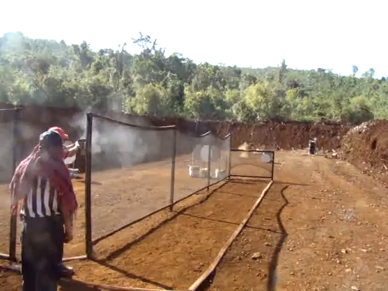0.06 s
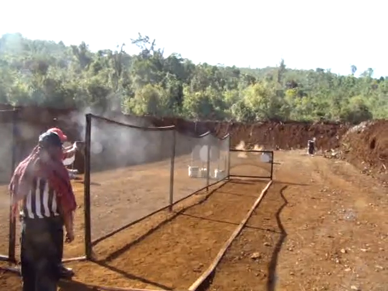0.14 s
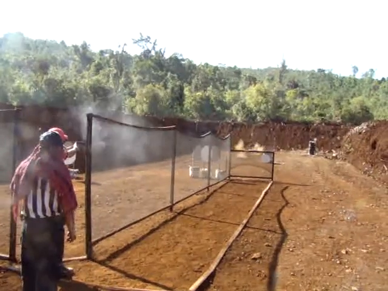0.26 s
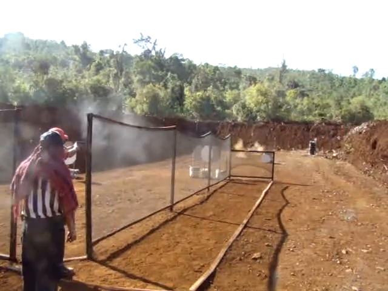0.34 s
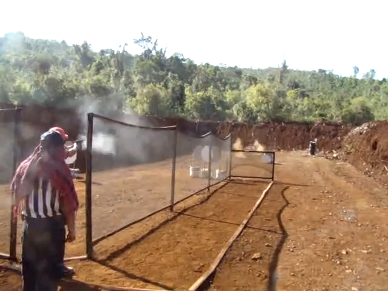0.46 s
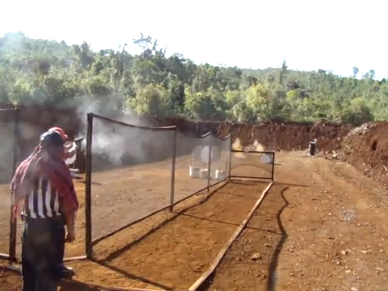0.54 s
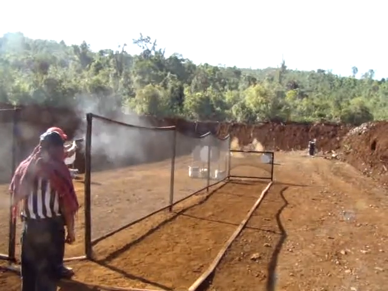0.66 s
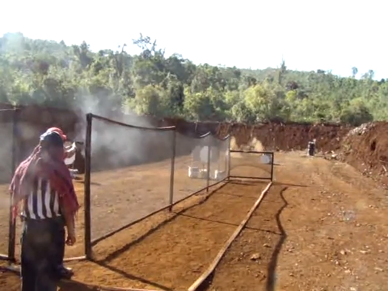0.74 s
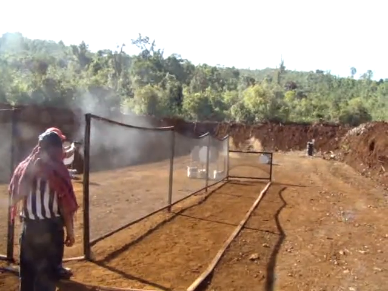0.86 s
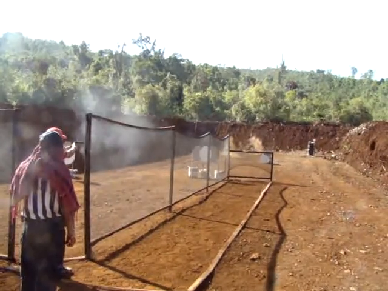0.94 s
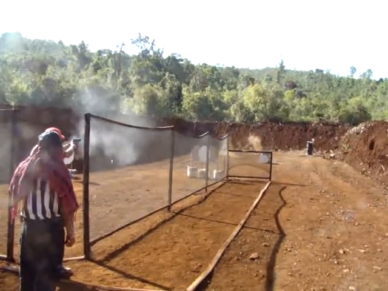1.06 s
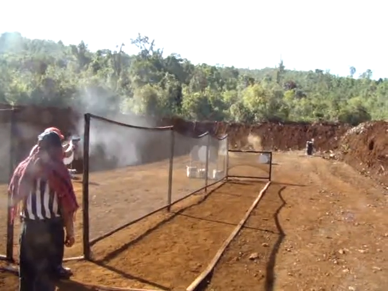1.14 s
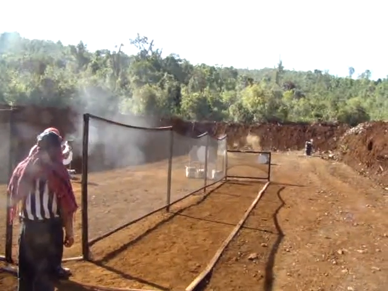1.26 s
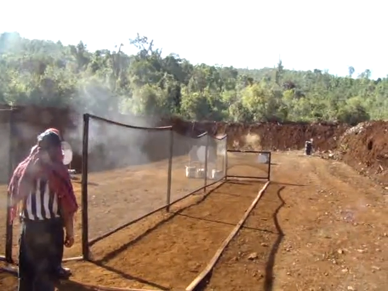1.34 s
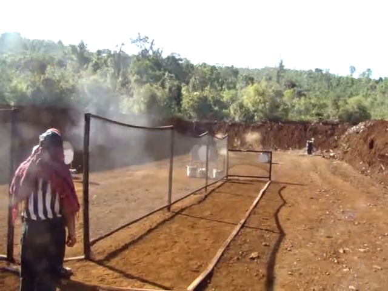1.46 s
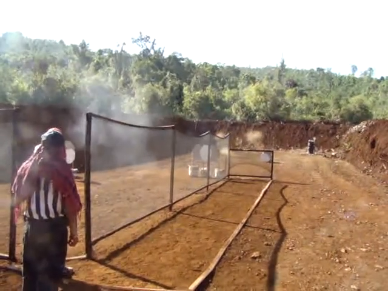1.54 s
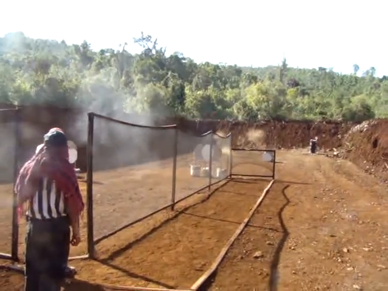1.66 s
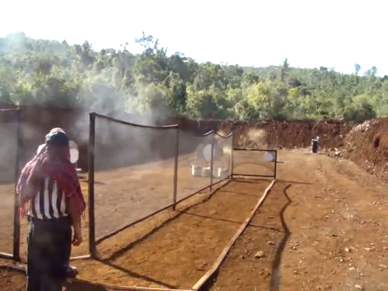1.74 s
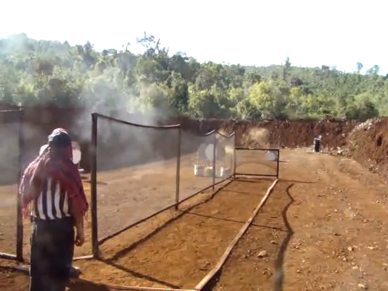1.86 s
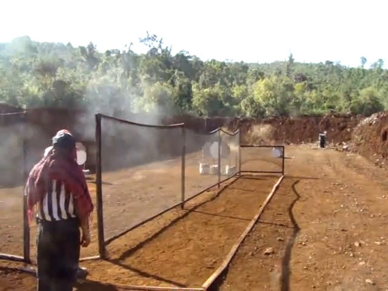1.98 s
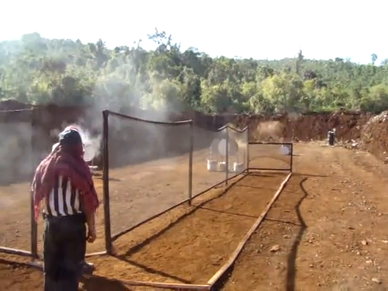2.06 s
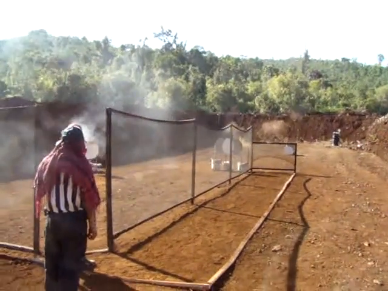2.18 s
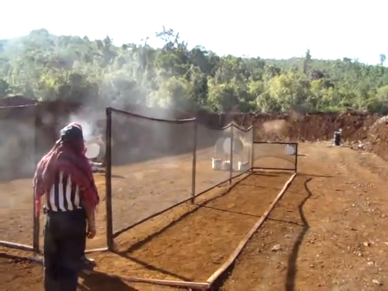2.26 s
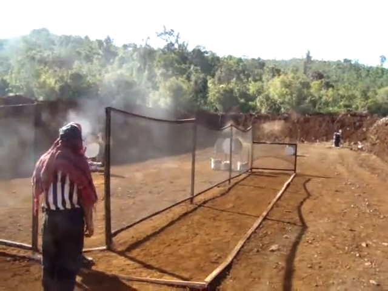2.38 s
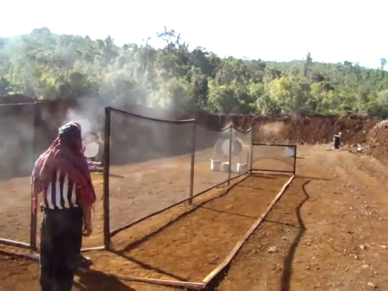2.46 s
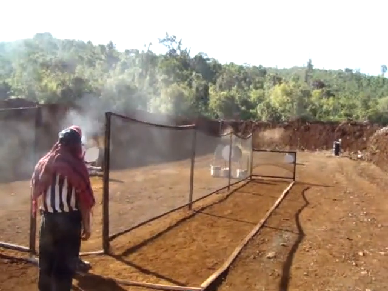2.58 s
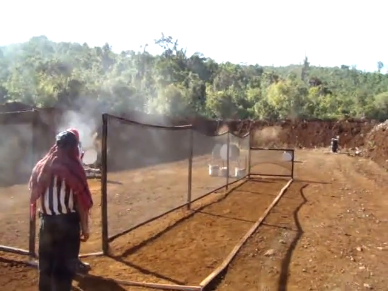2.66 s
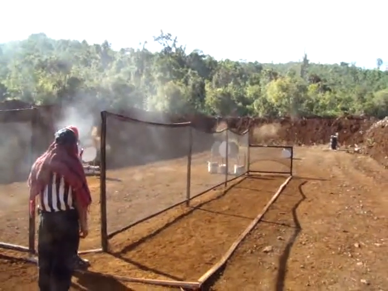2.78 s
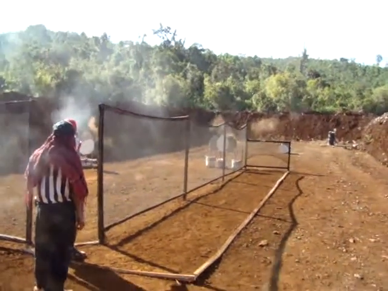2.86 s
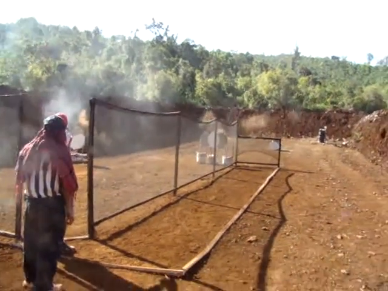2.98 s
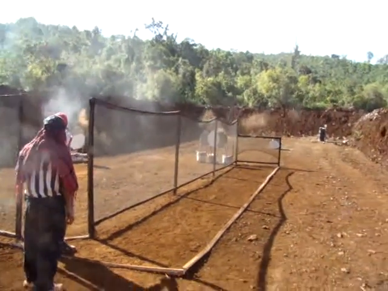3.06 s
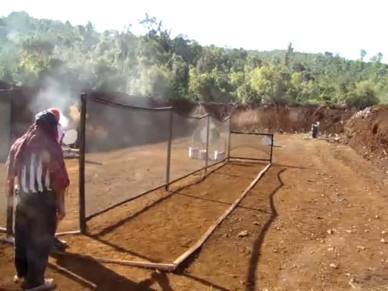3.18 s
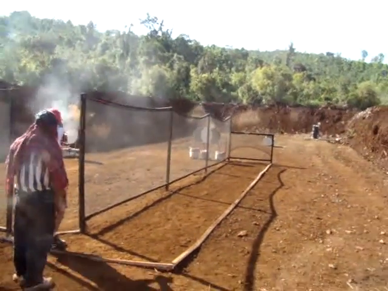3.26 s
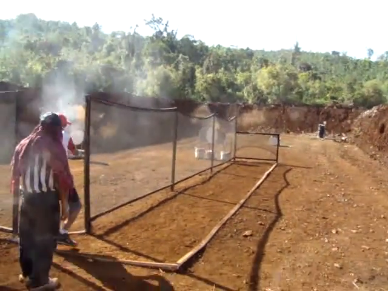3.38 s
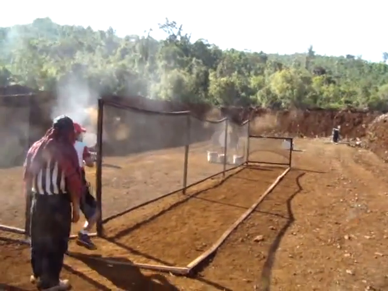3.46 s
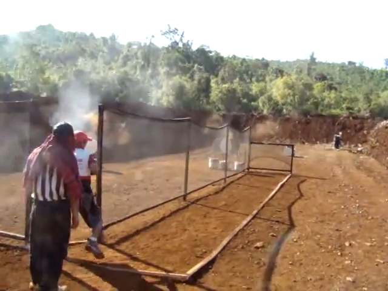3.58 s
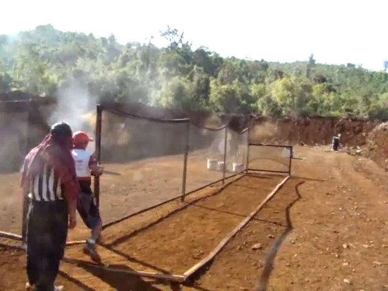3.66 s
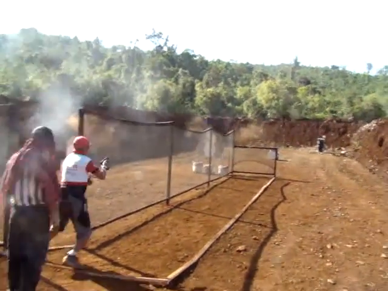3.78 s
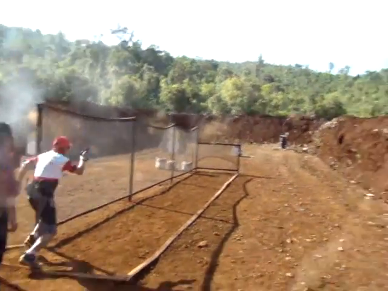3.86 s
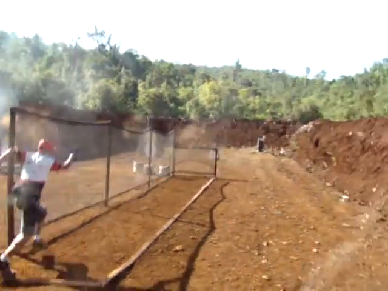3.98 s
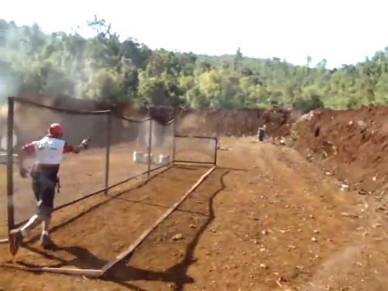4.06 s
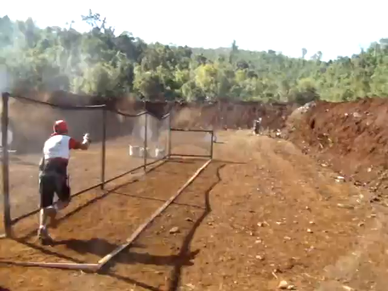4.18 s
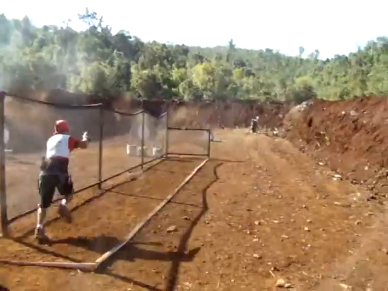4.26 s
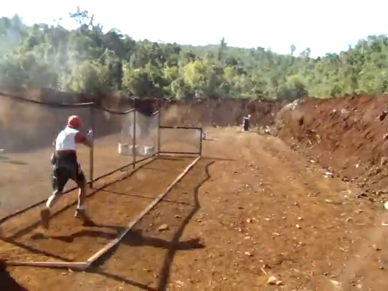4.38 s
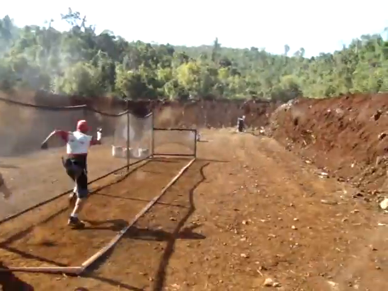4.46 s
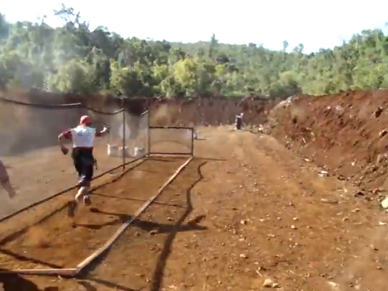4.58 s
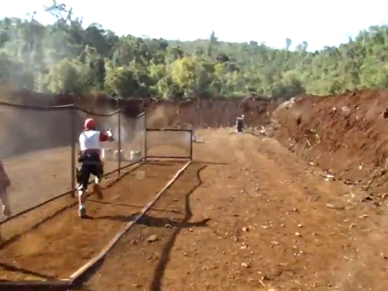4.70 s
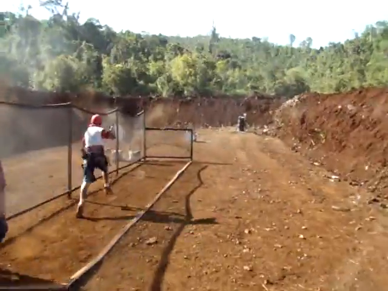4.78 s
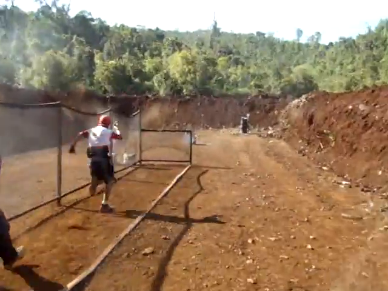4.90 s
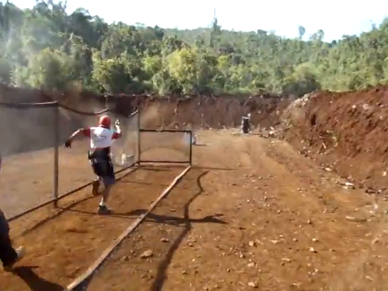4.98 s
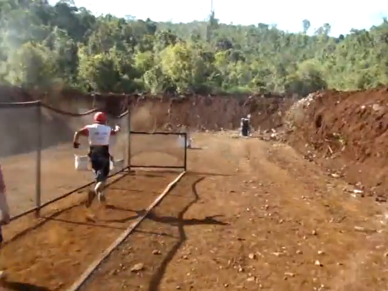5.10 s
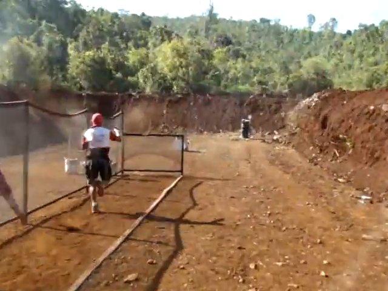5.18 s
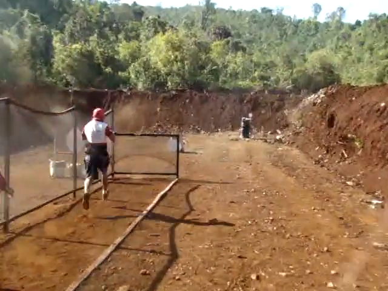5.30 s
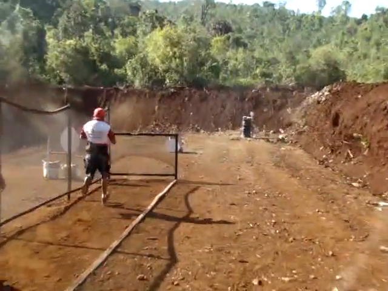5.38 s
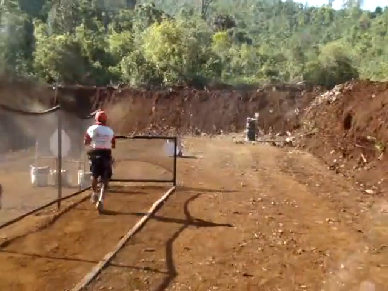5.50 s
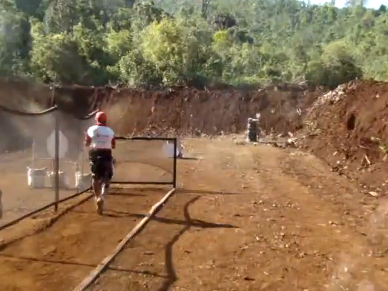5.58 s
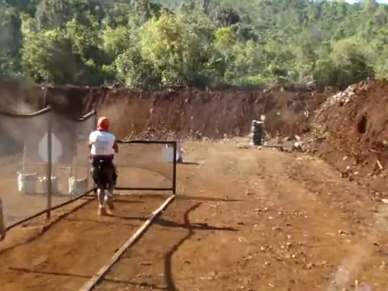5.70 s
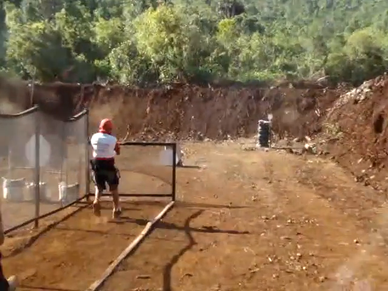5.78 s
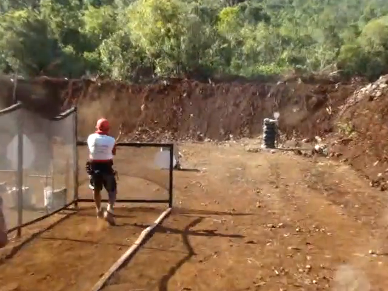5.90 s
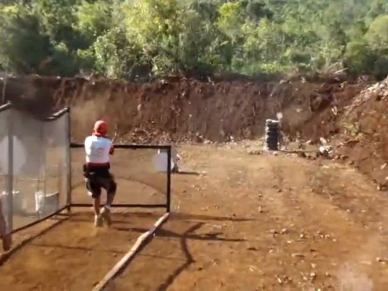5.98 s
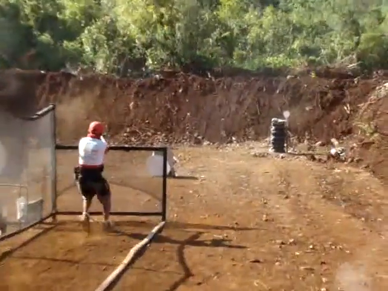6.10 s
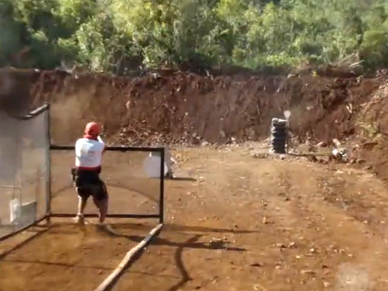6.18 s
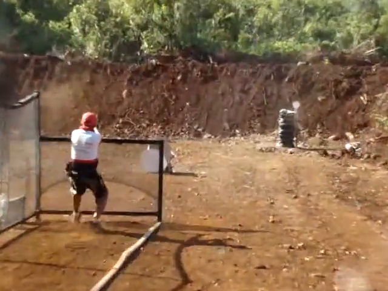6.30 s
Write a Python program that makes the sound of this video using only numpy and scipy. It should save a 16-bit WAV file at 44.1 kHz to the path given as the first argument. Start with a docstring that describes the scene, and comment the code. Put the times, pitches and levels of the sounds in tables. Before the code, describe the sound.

Sharp, slightly distorted handgun shots ring out close by in an earth-walled shooting range: three, a short pause with the tick of a landing case, then three more. Each has a quick rattling echo and a long, dull tail from far hills. As the last dies away, much quieter running footsteps scuff and crunch across gravelly ground. A soft wash of outdoor air lies beneath, all picked up by one small mono microphone.

```python
"""A handgun fires a string of shots in an earth-walled range bay, a few metres from a small mono camera.
Each blast overloads the microphone, rattles round the bay, slaps off screens and banks, and rolls back
from distant wooded hills. A spent case ticks as it lands; soft open air and a faint hum lie underneath.
Then the shooter runs on and boots follow, thudding and crunching over dry, stony dirt."""
import sys
import numpy as np
from scipy import signal
from scipy.fft import rfft, irfft
from scipy.io import wavfile

SR = 44100
rng = np.random.default_rng(int(sys.argv[2]) if len(sys.argv) > 2 else 0)


def to_wav(sig):
    """Store sig (one row per channel, or 1-D mono) as 16-bit WAV at the path in sys.argv[1].

    Samples outside -1..1 are clipped; the rate is SR.
    """
    pcm = np.clip(np.atleast_2d(sig), -1, 1) * 32767
    pcm = np.round(pcm).astype(np.int16)
    wavfile.write(sys.argv[1], SR, pcm.T)  # frames by channels


N = 279808
T = np.arange(N) / SR
AGE = T[:3 * SR]  # seconds since a sound began

# shots; only the tail of the first is heard
# (time [s], level [dB], treble [dB], ground bounce [dB], back bank [dB], hills [dB])
SHOTS = [(-0.115, 4, -1.5, -6, -22, -19.5), (0.045, -1, 4.5, -4, -18, -1), (0.6380, -2, 4, -10, -17, -3),
         (1.1524, -3, 3, -3, -14.5, -2.5), (2.1796, -.8, 4, -6.5, -18, -3), (2.7230, -3, 4, -4, -17, -1.5),
         (3.3192, -1.8, 2.5, -5, -19, -4)]
# microphone resonances rung by the blast (frequency [Hz], decay [s], level [dB])
MIC_RESONANCES = [(2340, 0.0022, -9.5), (3300, 0.0015, -6.5), (770, 0.0039, -17), (338, 0.0066, -31)]
# slaps from screens and banks close by (delay [s], relative level [dB], decay [s])
NEAR_SLAPS = [(0.0163, -9.5, 0.00073), (.0328, -43, 0.0031), (.0500, -14, 0.0021)]
# dull returns from the far hills (delay [s], relative level [dB])
HILL_ECHOES = [(.172, -31), (.443, -29.5), (0.504, -31), (0.54, -29.5), (.615, -34), (.785, -35.5)]
# tone of the shot off each surface, heard at the microphone (frequency [Hz], relative level [dB])
BAY_TONE = [(50, -25), (150, -38), (220, -22.5), (330, -2), (550, 1.5), (850, 6), (1400, -1.5),
            (2000, -3.5), (2700, -2), (3600, -0.5), (4300, -2.5), (5500, -9), (10000, -12.5)]
SLAP_TONE = [(100, -17.5), (300, -16), (650, 8), (1300, -10), (2200, 11.5), (3400, 6), (4500, 2),
             (6000, 3.5), (10000, -4)]
SIDE_BANK_TONE = [(150, -33.5), (400, -6), (900, 3.5), (1400, -3), (2200, -17), (3500, 3.5), (4300, -26),
                  (6000, -38), (10000, -11.5)]
BACK_BANK_TONE = [(100, -33), (330, -9), (650, 3), (1300, -19), (2000, -8), (3000, 0.5), (4500, -4.5),
                  (6000, -7.5), (10000, -11.5)]
BANK_RING_TONE = [(35, -78), (60, -40), (107, -58), (175, -18), (606, 1.5), (703, 0), (890, 2), (1460, -3),
                  (2600, -2), (3150, 1), (3820, -2.5), (7410, -5), (10000, -9), (13000, -52), (22000, -120)]
FOREST_TONE = [(200, -35), (500, -11.5), (1000, -10), (1700, -3.5), (2500, 0.5), (3300, 1.5), (4200, -2.5),
               (6500, -7), (10000, -14)]
HILL_KNOCK_TONE = [(150, -41), (380, -16.5), (540, -1.5), (720, -5), (1050, -10.5), (1500, -21),
                   (3000, -24), (8000, -63)]
HILL_ROLL_TONE = [(150, -30), (350, -10), (550, -7), (800, -2), (1100, 4), (1500, -2), (3000, -40),
                  (8000, -70)]
# tone of the open air and of the sounds underfoot (frequency [Hz], relative level [dB])
AIR_TONE = [(18, -104), (30, -21.5), (96, -22), (177, -25), (215, -24.5), (385, -15.5), (541, -1),
            (901, -1.5), (970, 0.5), (1180, -13.5), (1270, -7), (1700, -14), (3430, -19.5), (10000, -36),
            (13000, -69), (22000, -120)]
DIRT_TONE = [(18, -65), (30, -31), (81, -17), (215, -3.5), (385, 0.5), (742, 0.5), (970, -5), (1070, 4.5),
             (1360, -6), (4270, -9), (6780, -15.5), (8440, -14), (10000, -27), (13000, -105), (22000, -120)]
STONE_TONE = [(150, -19), (500, -24.5), (1200, -2.5), (2000, -8.5), (3500, -2.5), (6000, -7.5), (10000, -6)]
SOLE_TONE = [(30, -24), (100, -27), (210, 2.5), (330, -9.5), (700, -8.5), (1200, -11), (2500, -20),
             (8000, -36)]
# a spent case ticking as it lands, then loose stones tapping (time [s], level [dB], ring [Hz])
CASE_AND_STONE_CLICKS = [(1.368, -28, 8700), (4.274, -38, 1150), (4.450, -42, 1500), (4.791, -41.5, 2870),
                         (5.056, -36, 2880), (5.390, -38, 4200), (5.858, -34, 1200), (5.9787, -31, 7200)]
# a boot grinding on gravel (time [s], level [dB], decay [s])
GRAVEL_CRUNCHES = [(4.880, -34, .016), (4.954, -42, 0.015), (5.434, -36, 0.0076), (5.536, -38.5, .05),
                   (5.72, -38, .015), (5.792, -37, 0.011), (5.9788, -25, .002), (6.297, -46, .05)]
# footfalls (time [s], sole thud [dB], ground knock [dB], knock pitch [Hz])
FOOTFALLS = [(4.717, -56, -43, 594), (5.058, -44.5, -49, 700), (5.151, -46.5, -49, 660),
             (5.465, -48, -37.5, 980), (5.575, -44, -40, 700), (5.612, -38, -52, 654),
             (5.791, -40, -35.5, 950), (5.815, -37, -49, 400), (5.977, -38.5, -42, 1110),
             (6.249, -52.5, -40, 1160), (6.295, -43, -40, 709)]

MOVE_START_S, MOVE_RISE_S = 4.22, 1.19


def undb(db):
    """Decibels to gain."""
    return 10 ** (np.asarray(db) / 20)


def noise(size=len(AGE)):
    """White noise of unit power."""
    return rng.standard_normal(size)


def colour(x, tone, size=2048):
    """Causal filter through (Hz, dB) points that keeps the power of white noise."""
    hz, db = np.transpose(tone)
    log_hz = np.log(np.fft.rfftfreq(size, 1 / SR) + 1)
    gain = undb(np.interp(log_hz, np.log(hz), db))
    gain /= np.sqrt(np.mean(gain ** 2))
    cepstrum = irfft(np.log(gain))
    cepstrum[1:size // 2] *= 2  # fold to minimum phase
    cepstrum[size // 2 + 1:] = 0
    impulse = irfft(np.exp(rfft(cepstrum)))
    return signal.fftconvolve(x, impulse)[:len(x)]


def band(x, hz, kind, order=2):
    """Butterworth filter."""
    return signal.sosfilt(signal.butter(order, hz, kind, fs=SR, output="sos"), x)


def burst(delay_s, decay_s):
    """Envelope that jumps up after a delay and dies away."""
    return (AGE >= delay_s) * np.exp(-np.abs(AGE - delay_s) / decay_s)


def wander(per_s):
    """Slow random drift with a spread near 1."""
    count = int(N / SR * per_s) + 2
    return np.interp(T * per_s, np.arange(count), noise(count))


def grains(per_s, spread_db, size=len(AGE)):
    """A dense train of separate small pulses, unit power."""
    hits = rng.random(size) < per_s / SR
    polarity = np.sign(noise(size))
    strength = undb(spread_db * np.minimum(rng.exponential(size=size), 3))
    train = hits * polarity * strength
    return train / train.std()


def resonance(hz, width, size):
    """Noise in one resonance of a relative width, unit power."""
    edge = 1 + width / 2
    ringing = band(noise(size), [hz / edge, hz * edge], "band", order=1)
    return ringing / ringing.std()


def add(out, s, sound):
    """Mix a sound in at time s."""
    start = int(round(s * SR))
    sound, start = sound[max(-start, 0):], max(start, 0)
    out[start:start + len(sound)] += sound[:N - start]


def muzzle_blast(push_s=0.00011, gas_s=0.0032):
    """A shock front and its suction ring the microphone; powder gas tears out behind."""
    front = undb(-6) * (1 - AGE / push_s) * np.exp(-AGE / push_s)
    ring = sum(undb(db) * np.sin(2 * np.pi * hz * AGE) * burst(0, decay_s)
               for hz, decay_s, db in MIC_RESONANCES)
    gas = undb(-9) * colour(noise() * burst(0, gas_s), BAY_TONE)
    return gas - band(front + ring, 200, "high")


def slap(delay_s, db, decay_s, shock_db, smear_db=-3):
    """A flat face returns the shock as one sharp pulse, its edges as a short smear."""
    echo = undb(smear_db) * noise() * burst(delay_s, decay_s)
    echo[int(delay_s * SR)] += undb(shock_db)
    return undb(db) * echo


def posts(count=7, near_s=0.006, far_s=0.05, loss_db_per_s=130):
    """Posts and frames round the bay throw back thin cracks, weaker the longer their path."""
    cracks = np.zeros(len(AGE))
    for place, strength in rng.random((count, 2)):
        delay_s = near_s + place * (far_s - near_s)
        cracks[int(delay_s * SR)] += undb(-2.5 + 6 * strength - loss_db_per_s * delay_s)
    return colour(cracks, SLAP_TONE)


def bay(ground, side_delay_s, back_db, back_delay_s=0.0952, leave_s=0.055):
    """Rough ground scatters the blast until it has left the bay; screens and banks slap back."""
    inside = 1 / (1 + (AGE / leave_s) ** 20)
    scatter = colour(ground * undb(-16) * burst(0.00216, 0.046) * inside, BAY_TONE)
    near = colour(sum(slap(*row, shock_db=13.5) for row in NEAR_SLAPS), SLAP_TONE)
    side = colour(slap(side_delay_s, -12, 0.003, shock_db=17, smear_db=-2), SIDE_BANK_TONE)
    back = colour(slap(back_delay_s, back_db, 0.0021, shock_db=15.5, smear_db=0), BACK_BANK_TONE)
    return scatter + posts() + near + side + back


def banks_and_forest(tree_clumps, banks_decay_s=0.098, forest_decay_s=0.48):
    """The earth banks ring briefly; clumps of trees on the slopes return a long, lumpy hiss."""
    banks = colour(noise() * burst(0.045, banks_decay_s), BANK_RING_TONE)
    forest = colour(noise() * burst(0.11, forest_decay_s), FOREST_TONE)
    return undb(-27.5) * banks + undb(-41.5 + 0.4 * tree_clumps) * forest


def hills(knock_decay_s=0.018, roll_decay_s=1.0):
    """Distant slopes answer every shot with the same hollow knocks over a low roll."""
    knocks = sum(slap(delay_s, db, knock_decay_s, shock_db=18) for delay_s, db in HILL_ECHOES)
    roll = noise() * burst(0.039, roll_decay_s)
    return undb(-5) * colour(knocks, HILL_KNOCK_TONE) + undb(-50) * colour(roll, HILL_ROLL_TONE)


def gunfire(split_hz=700, treble_hz=1800):
    """Shots a few metres off: long waves keep their paths, short ones change as the muzzle moves."""
    out = np.zeros(N)
    hill_echo = hills()
    long_waves = band(grains(6000, 2.4), split_hz, "low")
    tree_clumps = wander(22.2)[:len(AGE)]
    for s, db, treble_db, bounce_db, back_db, hill_db in SHOTS:
        ground = long_waves + band(grains(3500, 5.5), split_hz, "high")
        bounce = colour(slap(0.0031, bounce_db, 0.0014, shock_db=12), BAY_TONE)
        # the side bank answers a little sooner once the shooter has leaned toward it
        side_delay_s = np.interp(s, [1.2, 2.1], [0.0462, 0.0452])
        shot = muzzle_blast() + bounce + bay(ground, side_delay_s, back_db)
        shot += banks_and_forest(tree_clumps)
        shot += (undb(treble_db) - 1) * band(shot, treble_hz, "high", order=1)
        add(out, s, undb(db) * (shot + undb(hill_db) * hill_echo))
    return out


def open_air(level_db=-54.5):
    """A soft wash all round the microphone, its level drifting slightly."""
    return colour(noise(N), AIR_TONE) * undb(level_db + wander(3.29))


def hum(starts_s=(0.513, 3.416), length_s=0.134, fade_s=0.0037, hz=197.3):
    """A faint low hum with a weaker octave comes twice, alike each time."""
    phase = 2 * np.pi * hz * T
    tone = np.sqrt(2) * (np.sin(phase) + undb(-2.5) * np.sin(2 * phase))
    gate = sum(np.clip(np.minimum(T - s, s + length_s - T) / fade_s, 0, 1) for s in starts_s)
    return undb(-60) * gate * tone


def click(hz, decay_s=0.0044, size=12000):
    """A spent case or a stone taps the stony ground: a short ring with a little grit."""
    ring = resonance(hz, width=0.34, size=size)
    grit = undb(-2.5) * colour(grains(7000, 2.9, size), STONE_TONE)
    return burst(0, decay_s)[:size] * (ring + grit)


def case_and_stones(pebbles_per_s=8, pebble_hz=2000, spread_octaves=0.84, size=12000):
    """A spent case lands; later gravel crunches, stones click and kicked pebbles skitter underfoot."""
    out = np.zeros(N)
    for s, db, decay_s in GRAVEL_CRUNCHES:
        gravel = colour(grains(7000, 2.8, size), STONE_TONE)
        add(out, s, undb(db) * burst(0, decay_s)[:size] * gravel)
    for s, db, hz in CASE_AND_STONE_CLICKS:
        add(out, s, undb(db) * click(hz))
    span_s = N / SR - MOVE_START_S
    for when, strength, pitch in rng.random((int(pebbles_per_s * span_s), 3)):
        s = MOVE_START_S + when * span_s
        pebble = click(pebble_hz * 2 ** (spread_octaves * (2 * pitch - 1)))
        add(out, s, movement(s) * undb(-45.5 + 6 * strength) * pebble)
    return out


def movement(t):
    """How briskly people move, as a gain from 0 to 1: the power grows evenly, then holds."""
    return np.sqrt(np.clip((t - MOVE_START_S) / MOVE_RISE_S, 0, 1))


def shuffle(scuff_db=-47.5, grit_db=-51, uneven_db=2):
    """Dirt scuffs and dense grit crackles once people start to move."""
    scuff = colour(noise(N), DIRT_TONE) * undb(scuff_db + uneven_db * wander(30))
    grit = colour(grains(3000, 11, N), STONE_TONE) * undb(grit_db + uneven_db * wander(40))
    return movement(T) * scuff + movement(T) ** 2 * grit


def footsteps(decay_s=0.018, size=12000):
    """Each sole thuds and makes the packed earth knock; all die away alike."""
    out = np.zeros(N)
    for s, thud_db, knock_db, hz in FOOTFALLS:
        thud = undb(thud_db) * colour(grains(7000, 3.2, size), SOLE_TONE)
        knock = undb(knock_db) * resonance(hz, width=0.18, size=size)
        add(out, s, burst(0, decay_s)[:size] * (thud + knock))
    return out


def scene():
    """One microphone in the bay feeds both channels."""
    mono = gunfire() + footsteps() + case_and_stones() + shuffle() + open_air() + hum()
    return np.tile(mono, (2, 1))


def record(dry, mic_limit=0.67, ceiling=0.7, top_hz=10050, clipped_top_hz=16000):
    """The microphone saturates on the blasts; the camera narrows the band and clips what overshoots."""
    def steep_lowpass(x, hz):
        return signal.sosfilt(signal.ellip(10, 0.2, 70, hz, fs=SR, output="sos"), x)

    at_mic = band(dry, top_hz + 1000, "low", order=6)
    saturated = at_mic / (1 + (at_mic / mic_limit) ** 6) ** (1 / 6)
    # little bass from the overload gets through the input stage
    distortion = band(saturated - at_mic, 320, "high", order=1)
    narrow = steep_lowpass(at_mic + distortion, top_hz)
    clipped = np.clip(narrow, -ceiling, ceiling)
    return steep_lowpass(clipped, clipped_top_hz)


dry = scene()
out = record(dry)
to_wav(out)
```